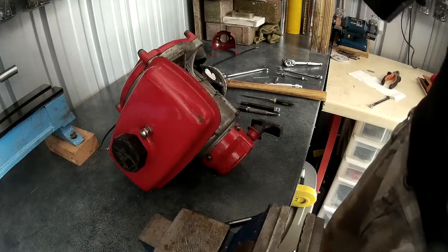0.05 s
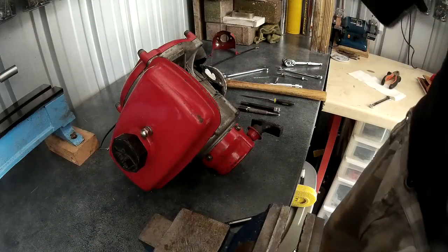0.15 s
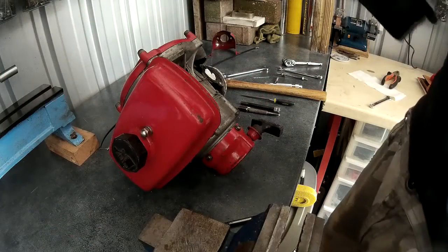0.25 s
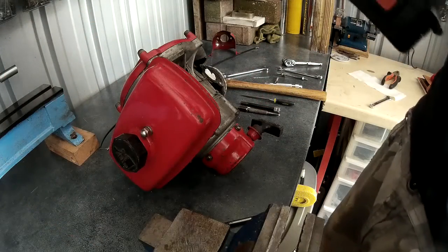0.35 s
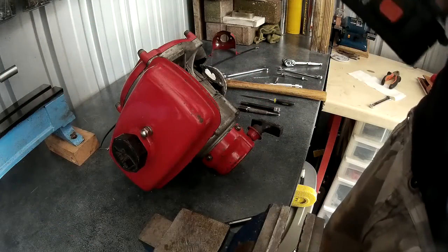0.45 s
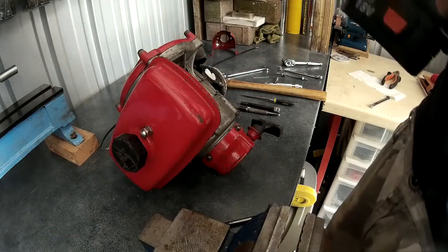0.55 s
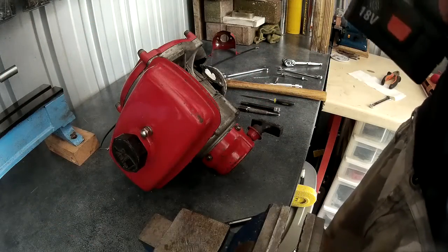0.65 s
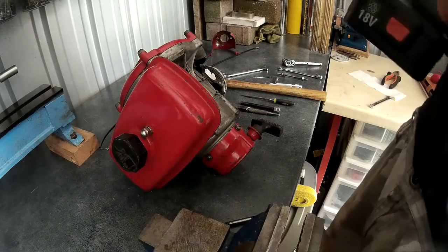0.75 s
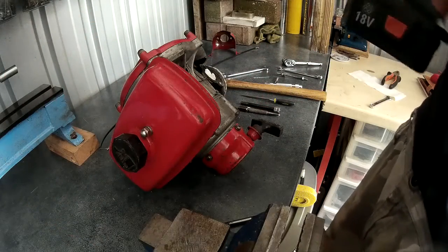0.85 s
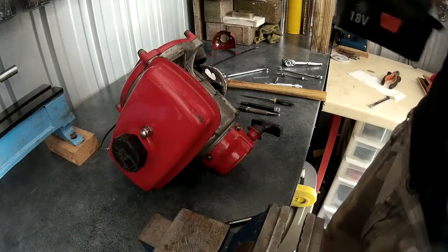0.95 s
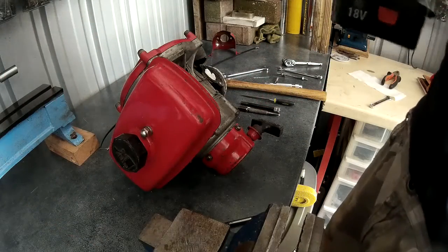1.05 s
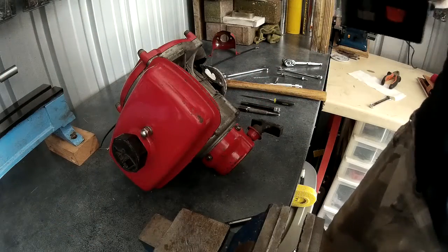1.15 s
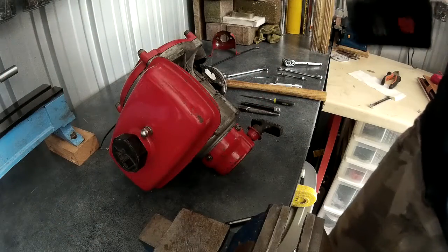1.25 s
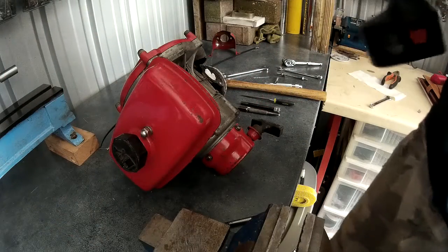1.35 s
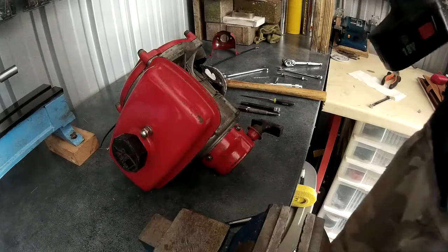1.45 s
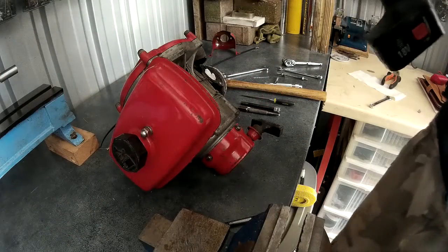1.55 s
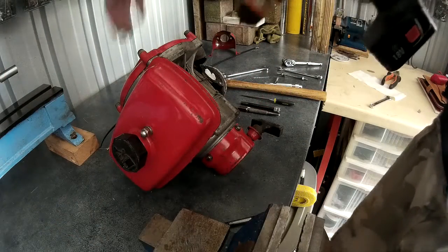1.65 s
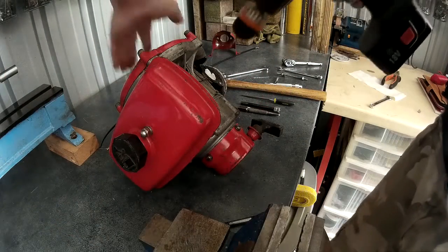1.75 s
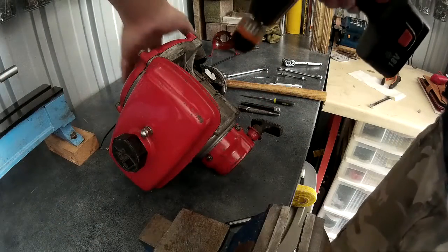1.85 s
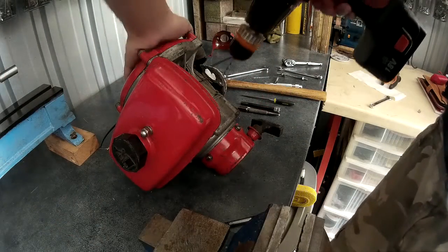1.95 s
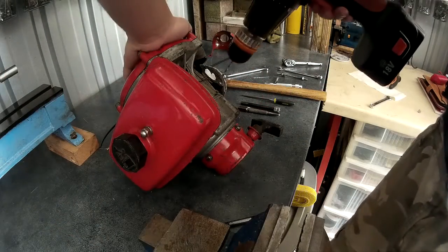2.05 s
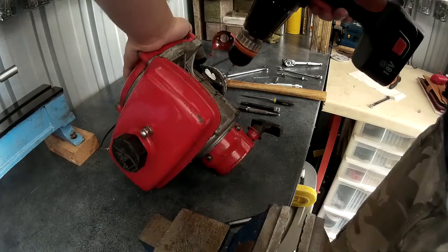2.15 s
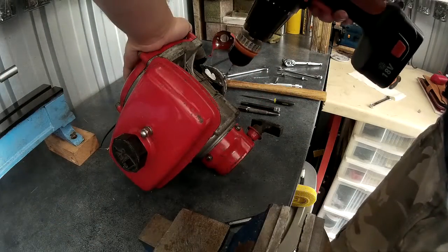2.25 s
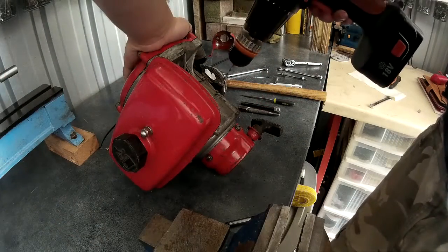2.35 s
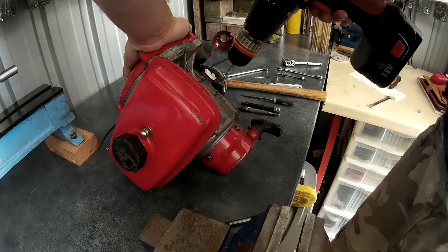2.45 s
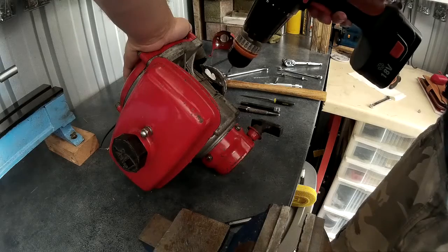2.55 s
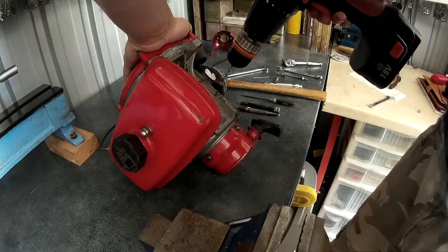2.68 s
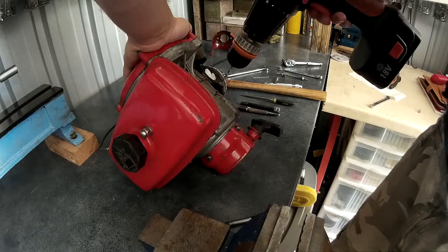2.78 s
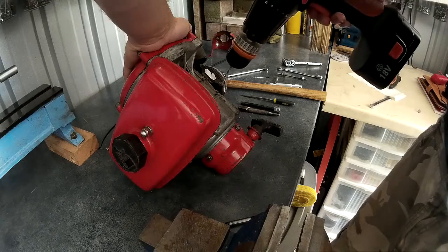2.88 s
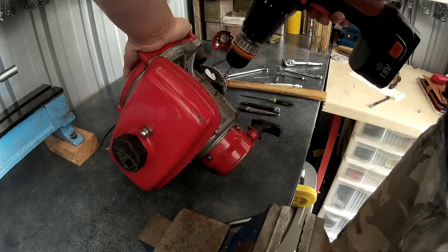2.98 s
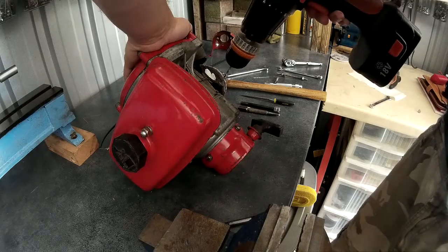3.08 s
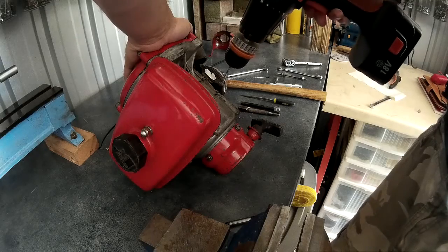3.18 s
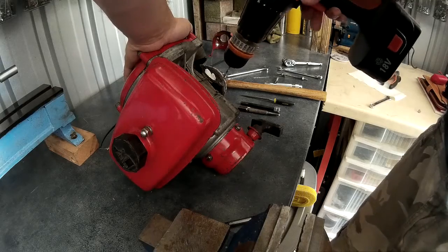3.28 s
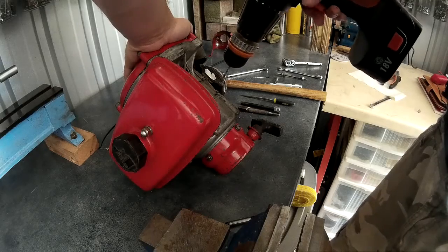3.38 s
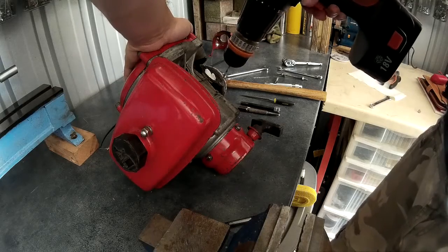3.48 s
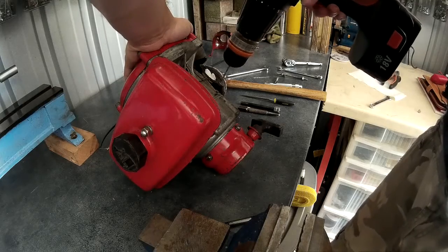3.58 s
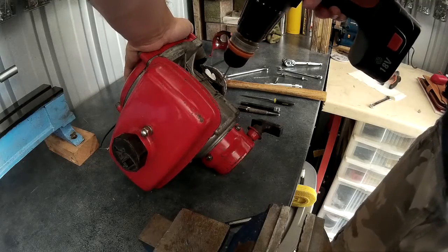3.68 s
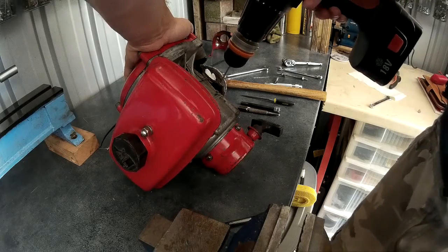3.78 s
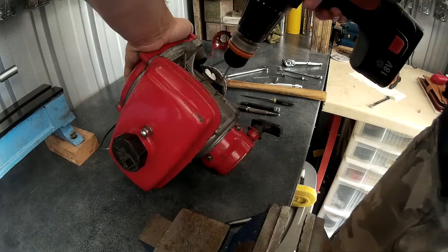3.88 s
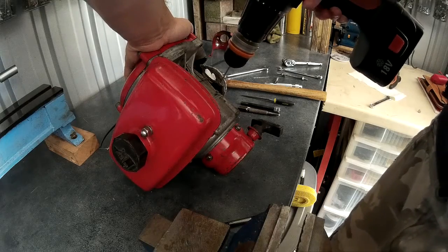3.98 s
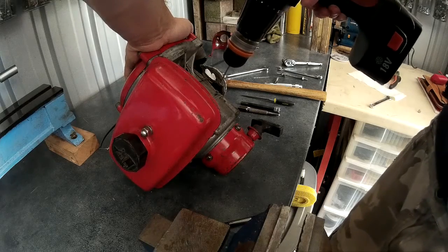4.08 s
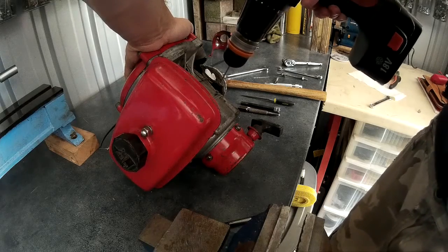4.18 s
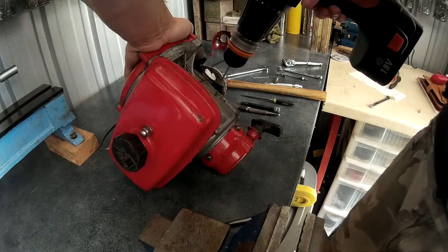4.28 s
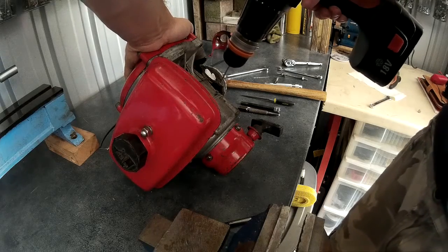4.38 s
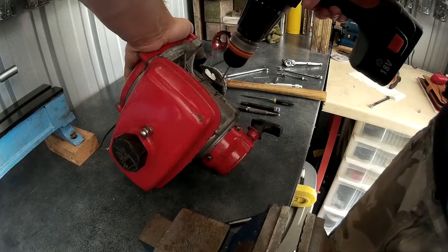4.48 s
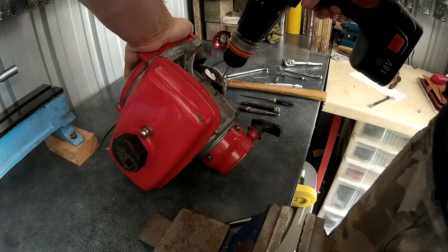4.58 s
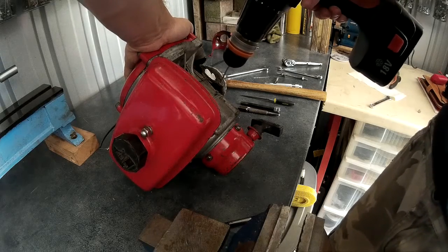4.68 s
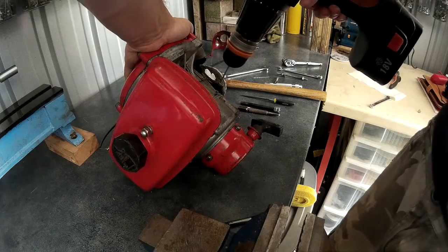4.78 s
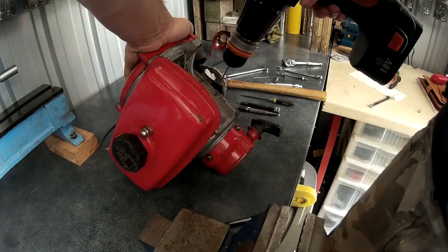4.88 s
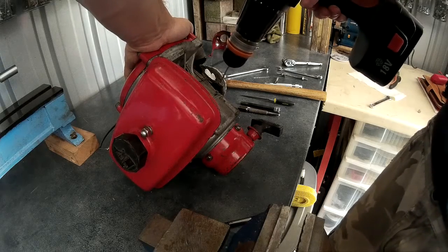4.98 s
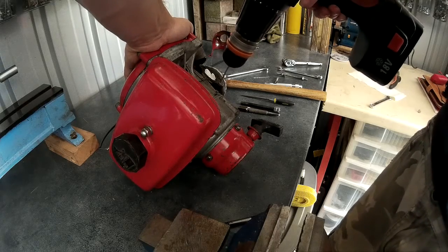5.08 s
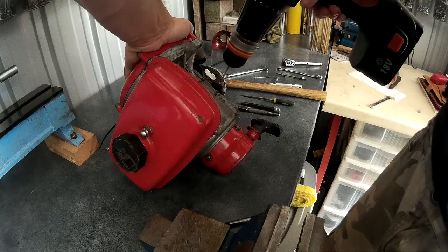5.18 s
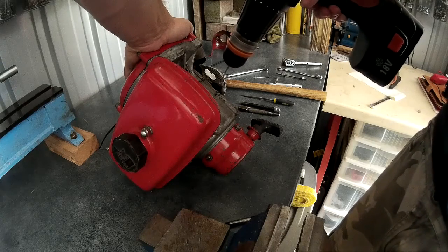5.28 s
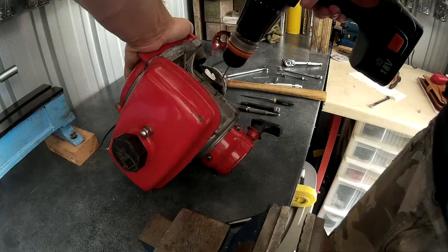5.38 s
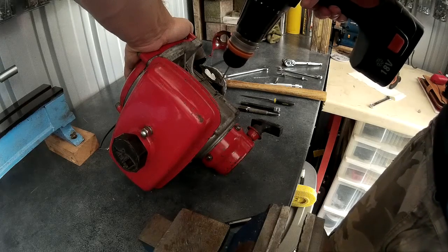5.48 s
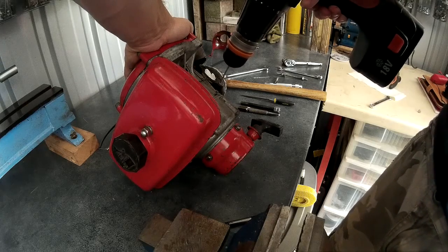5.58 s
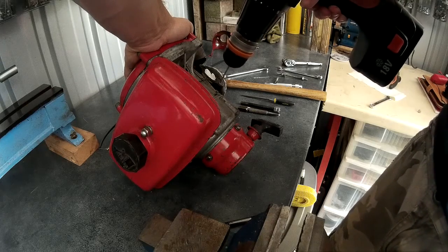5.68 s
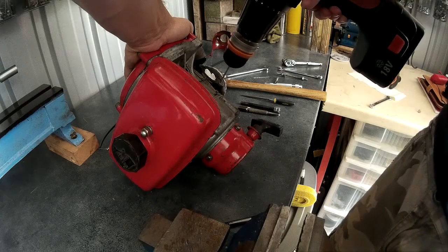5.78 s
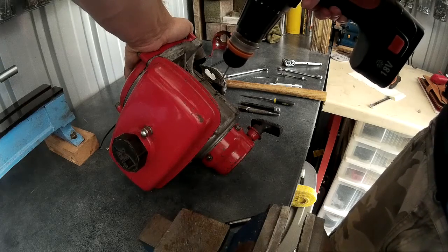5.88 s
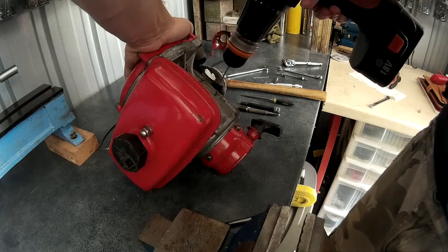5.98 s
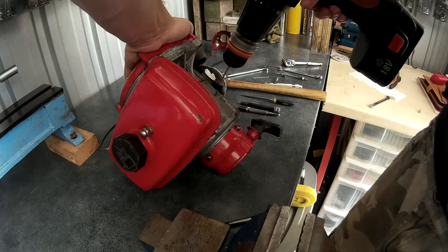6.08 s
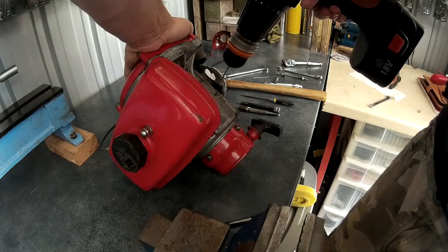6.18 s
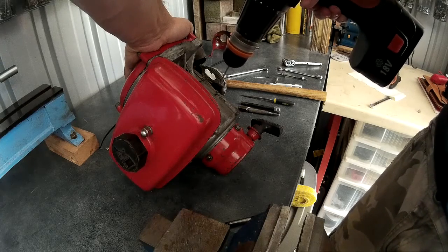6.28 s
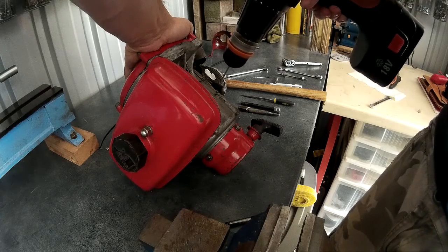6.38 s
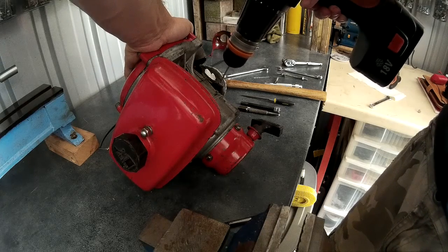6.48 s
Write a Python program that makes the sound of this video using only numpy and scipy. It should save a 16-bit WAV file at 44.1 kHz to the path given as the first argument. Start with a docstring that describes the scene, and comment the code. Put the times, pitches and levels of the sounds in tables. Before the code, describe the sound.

In a small workshop a drill clunks and rubs in the hand, then starts up and grinds steadily into an engine casing, growing harsher.

```python
"""Cordless drill into a small engine

A drill is picked up in a small workshop, a hand steadies an engine on the bench, and the bit runs into its casing.
Mesh tones that follow the chuck's angle beat into a hum that throbs once a turn; noise filtered by the housing
gives the gear rattle. Blurred tones make the motor whine; filtered noise makes the hiss of brushes and bit.
Knocks are decaying body and shell rings with noise thuds and cracks; rubbing, a squeak, faint high puffs and
room noise are shaped noise and narrow wandering tones."""
import sys
import numpy as np
from scipy import signal
from scipy.fft import rfft, irfft
from scipy.io import wavfile
from scipy.ndimage import map_coordinates

SR = 44100
rng = np.random.default_rng(int(sys.argv[2]) if len(sys.argv) > 2 else 0)


def to_wav(s):
    """Save 16-bit WAV."""
    ch = np.atleast_2d(s).T  # columns
    pcm = np.round(np.clip(ch, -1, 1) * 32767)  # PCM
    wavfile.write(sys.argv[1], SR, pcm.astype(np.int16))


N = 288369
TIME = np.arange(N) / SR  # seconds


def drill(gear_full_db=-21.5, motor_full_db=-31, hiss_db=0.34):
    """All parts follow one shaft; gear tones grow with the rattle, motor tones with the hiss."""
    turns = chuck_turns()
    hum_gain, rattle_gain, drive = effort()
    hum = hum_gain * gear_hum(turns) * backlash(turns)
    rattle = rattle_gain * gear_rattle(turns)
    # the whine table holds its levels when rattle and drive stand at these two reference levels
    gear_gain = rattle_gain / amp(gear_full_db)
    motor_gain = drive / amp(motor_full_db)
    tones = whine(turns, gear_gain, motor_gain) + motor_gain * chuck_rub(turns)
    return hum + rattle + tones + drive * amp(hiss_db) * hiss(turns)


# the trigger is pulled part way, then squeezed home; the hand leans in until the bit bites (s)
START_S, SQUEEZE_S, LEAN_S, BITE_S = 3.545, 3.7, 4.4, 4.75
SQUEEZE_TAKES_S, LEAN_TAKES_S = .33, .4
# chuck speed (turns a second): part trigger, full trigger, lost by leaning in, lost in each second of cutting
PART_SPEED, FULL_SPEED, LEAN_DROP, SAG_PER_S = 12.7, 13.38, .14, .022
# share of the speed missing at the start, and the time constant of making it up (s)
SPIN_LAG, SPIN_UP_S = .2, .025
TIGHT_AT = 5.067  # a moment when the gears pass their tight spot (s)


def chuck_turns():
    """Chuck angle in turns, whole at the tight spot; the trigger speeds it up, the load slows it."""
    spin = 1 - SPIN_LAG * np.exp(-np.maximum(TIME - START_S, 0) / SPIN_UP_S)
    free = PART_SPEED + (FULL_SPEED - PART_SPEED) * ease(SQUEEZE_S, SQUEEZE_TAKES_S)
    drag = LEAN_DROP * ease(LEAN_S, LEAN_TAKES_S) + SAG_PER_S * np.maximum(TIME - BITE_S, 0)
    turns = np.cumsum(spin * (free - drag)) / SR
    return turns - np.interp(TIGHT_AT, TIME, turns)


GEAR_ATTACK_S, MOTOR_ATTACK_S = 0.078, .2
# the load on the gears grows in two steps, with the squeeze and with the bite
LOAD_RISE_S, BITE_RISE_S, BITE_SHARE = 0.51, 0.041, 0.32
# gains under full load, and how much lower they are without load (dB)
HUM_DB, HUM_LOAD_DB = -18, 8.5
RATTLE_DB, RATTLE_LOAD_DB = -21, 6.5
HISS_DB, HISS_LOAD_DB = -32, 1.5
DEEPER_DB_PER_S = 0.5  # the rattle grows as the bit sinks in
JOLT_S, JOLT_LENGTH_S, JOLT_DB = 3.651, 0.0083, -16.5  # the gears jolt as the bit first catches


def effort():
    """Gains of gear hum, gear rattle and hiss: each rises at the start and grows with the load."""
    squeezed, bitten = ease(SQUEEZE_S, LOAD_RISE_S), ease(BITE_S, BITE_RISE_S)
    slack = 1 - (1 - BITE_SHARE) * squeezed - BITE_SHARE * bitten
    gears, motor = ease(START_S, GEAR_ATTACK_S), ease(START_S, MOTOR_ATTACK_S)
    jolt = amp(JOLT_DB) * swell(JOLT_S, JOLT_LENGTH_S)
    hum = motor * amp(HUM_DB - HUM_LOAD_DB * slack) + jolt
    deeper_db = DEEPER_DB_PER_S * np.maximum(TIME - BITE_S, 0)
    rattle = gears * amp(RATTLE_DB - RATTLE_LOAD_DB * slack + deeper_db)
    return hum, rattle, motor * amp(HISS_DB - HISS_LOAD_DB * slack)


# Gear mesh tones, in step at the tight spot of each turn.
# Each row: cycles in a turn of the chuck, relative level in dB.
MESH_TONES = [(44, -9), (45, -4), (46, -2), (48, -26)]


def gear_hum(turns):
    """Neighbouring mesh tones beat into one throb a turn; the backlash limits the swing and rounds its top."""
    tones = unit(sum(amp(db) * np.exp(2j * np.pi * round(k) * turns) for k, db in MESH_TONES))
    swing = tones / (1 + (abs(tones) / 1.45) ** 4) ** .25  # soft limit on the swing
    judder = 1 + .1 * drift(hz=25) + .11 * drift(hz=130)
    return unit((swing * judder).real)


def backlash(turns, at_turn=.685, width=0.03, slack_db=-5, take_up=0.082, clap_db=4):
    """The teeth lose contact for a moment, then clap together as they take up the load of each turn."""
    since = turns % 1 - at_turn
    gap = np.exp(-(since / width) ** 2)
    clap = np.exp(-((since - take_up) / width) ** 2)
    return amp(slack_db * gap + clap_db * clap)


# Colour of the housing and engine casing, shaken by the gears.
# Each row: frequency in Hz, relative level in dB per Hz.
HOUSING_COLOUR = [(40, -41), (90, -27.5), (180, -29.5), (290, -15.5), (410, -16.5), (500, -5), (560, 1.5),
                  (650, 2), (730, -2.5), (830, 0.5), (960, -9.5), (1120, -10.5), (1300, -24), (2500, -53)]


def gear_rattle(turns, throb_db=1.0):
    """The teeth knock harder at the tight spot and shake the housing."""
    return colour(scrape(turns, repeat=0.35) * tight_spot(turns, throb_db), HOUSING_COLOUR)


def tight_spot(turns, depth_db):
    """Load on the teeth: high for half of each turn of the chuck."""
    return unit(amp(depth_db * np.tanh(2 * np.cos(2 * np.pi * turns))))


def scrape(turns, repeat, size=3300):
    """Roughness of worn teeth that comes round with every turn, mixed with fresh chatter."""
    worn = map_coordinates(rng.standard_normal(size), [turns % 1 * size], order=3, mode="grid-wrap")
    share = np.clip(repeat, 0, 1)
    return np.sqrt(share) * unit(worn) + np.sqrt(1 - share) * rng.standard_normal(N)


# Gear and motor tones.
# Each row: cycles in a turn of the chuck, level in dB before the load gain, roughness from 0 to 1.
WHINE_TONES = [(12, -58, .1), (18, -46, .1), (24, -50, .2), (25, -53, .1), (36, -43, .2), (41, -33, .2),
               (51, -37, .3), (60, -34, .5), (64, -36, .3), (69, -40, .2), (72, -41, .2), (81, -46, .3),
               (108, -48, .3), (109, -48, .3), (114, -51, .3), (132, -47, .2), (136, -41, .2),
               (138, -47, .3), (161, -49, .5), (216, -45.5, .4), (270, -53, .7), (288, -48.5, .4),
               (313, -48.5, .5), (359, -54, .7), (387, -57, .9), (540, -60, .5), (553, -63, .5),
               (695, -68, .6), (720, -68, .7)]


def whine(turns, gear_gain, motor_gain, throb_db=2.0, motor_throb_db=2.0):
    """Tones blurred by play in their shafts; the slow ones belong to the gears, the fast ones to the motor."""
    out = np.zeros(N)
    slow = gear_gain * tight_spot(turns, throb_db)
    fast = motor_gain * tight_spot(turns, motor_throb_db)
    for k, db, rough in WHINE_TONES:
        blur = np.sqrt(1 - rough ** 2) + rough * drift(hz=26.0)
        tone = (blur * np.exp(2j * np.pi * (k * turns + rng.random()))).real
        out += amp(db) * np.sqrt(2) * tone * (slow if k < 100 else fast)
    return out


def chuck_rub(turns, order=179.5, rub_db=-42, at_turn=.53, sharp=1.4, rough=.6):
    """The chuck runs slightly out of true and rubs with a brief ring on the loose side of each turn."""
    touch = unit(np.exp(sharp * np.cos(2 * np.pi * (turns - at_turn))))
    since = (turns - at_turn + .5) % 1  # the phase of the ring starts afresh every turn
    ring = unit(((1 + rough * drift(hz=30)) * np.exp(2j * np.pi * order * since)).real)
    return amp(rub_db) * touch * ring


GEAR_RATIO = 24  # motor pulses in a turn of the chuck
# Colour of brushes, fan and bit.
# Each row: frequency in Hz, relative level in dB per Hz.
HISS_COLOUR = [(400, -51), (1400, 0.5), (2150, 0.5), (2420, -1.5), (2560, -9), (2900, -6), (4400, -11.5),
               (5300, -10), (6200, -21), (7300, -19), (9200, -22), (9800, -27.5), (11500, -24),
               (13300, -43)]


def hiss(turns, flutter=0.034, throb_db=0.88, loose_turn=0.5, treble_hz=4000, dull_db=-8, brighten_s=0.3):
    """Noise pulses with the motor, swells on each turn's loose side, brightens in the first moments of drilling."""
    pulse = 1 + flutter * np.cos(2 * np.pi * GEAR_RATIO * turns)
    throb = amp(throb_db * np.cos(2 * np.pi * (turns - loose_turn)))
    scratch = colour(scrape(turns, repeat=0.26) * pulse * throb, HISS_COLOUR)
    low = signal.sosfiltfilt(signal.butter(2, treble_hz, fs=SR, output="sos"), scratch)
    treble = scratch - low
    return low + treble * amp(dull_db * (1 - ease(START_S, brighten_s)))


# Colour of the engine's casing as it shudders.
# Each row: frequency in Hz, relative level in dB per Hz.
CASING_COLOUR = [(120, -34), (230, -6), (340, 0), (460, 0), (700, -12), (2000, -40)]


def shudder(s=3.665, level_db=-35, length=0.053):
    """The first catch of the bit shakes the engine's casing."""
    return amp(level_db) * swell(s, length) * colour(rng.standard_normal(N), CASING_COLOUR)


# thin squeal of the bit before it cuts; the gain is for a complex tone, whose real part is 3 dB softer
SQUEAL_S, SQUEAL_HZ, SQUEAL_GAIN_DB = 3.68, 11200, -56.5
SQUEAL_ATTACK_S, SQUEAL_HOLD_S, SQUEAL_T60 = .17, 0.48, 1.0  # hold counts from the start of the attack
# Brief scratches of the bit on the metal.
# Each row: centre in seconds, level in dB, half-length in seconds.
BIT_SCRATCHES = [(3.725, -33.5, 0.012), (4.795, -26.5, 0.013)]


def bit(width_hz=60):
    """The tip squeals thinly as it seats, a wandering narrow tone, and scratches now and then."""
    seating = amp(SQUEAL_GAIN_DB) * stroke(SQUEAL_S, SQUEAL_ATTACK_S, SQUEAL_HOLD_S, SQUEAL_T60)
    squeal = seating * (drift(hz=width_hz) * np.exp(2j * np.pi * SQUEAL_HZ * TIME)).real
    bursts = sum(amp(db) * swell(s, length) for s, db, length in BIT_SCRATCHES)
    return squeal + bursts * colour(rng.standard_normal(N), HISS_COLOUR)


# Knocks of the drill in the hand and on the engine.
# Each row: start in seconds, body level in dB, body pitch in Hz, body ring t60 in seconds, snap level in dB,
# snap centre in Hz, thud level in dB (before the thuds are halved).
KNOCK_HITS = [(.032, -39, 676, 0.06, -38, 1890, -52), (.197, -46, 700, .04, -48, 1700, -58),
              (.404, -40.5, 704, 0.031, -48, 1750, -45), (.516, -43, 624, .05, -46.5, 1410, -42),
              (.723, -56, 700, .03, -55, 1600, -64), (1.084, -39.5, 666, 0.065, -45, 1900, -44),
              (1.197, -24, 690, 0.022, -38, 1400, -61), (1.2425, -24.5, 710, 0.031, -33.5, 2100, -54),
              (1.2735, -19.5, 664, 0.03, -32.5, 1500, -65), (1.294, -40, 780, 0.045, -36, 3280, -62),
              (1.405, -40, 690, 0.032, -51, 2100, -62), (1.492, -38, 600, .04, -39, 3620, -59),
              (1.503, -48, 653, 0.083, -34, 2150, -45), (1.575, -48, 546, 0.056, -33, 2000, -39.5),
              (3.092, -49, 666, 0.04, -61, 1400, -51), (3.196, -46, 650, .03, -42.5, 1900, -62),
              (3.263, -24.5, 670, 0.039, -37.5, 1690, -29), (3.279, -32, 730, 0.056, -47, 1700, -42),
              (3.308, -53, 473, .04, -61, 1400, -60), (3.407, -50, 685, .06, -51, 1800, -50),
              (3.491, -52, 650, 0.062, -60, 1400, -52)]
# Modes of the plastic shell. Each row: frequency in Hz, ring t60 in seconds, relative level in dB.
SHELL_MODES = [(1027, 0.021, 21), (1220, 0.012, 4), (1590, 0.018, 1), (1770, 0.021, 6), (2048, 0.075, -9),
               (2233, 0.021, 2), (2820, 0.017, -5), (3200, 0.025, -6), (3570, 0.024, -5.5),
               (4460, 0.029, -11), (5080, .025, -1)]
# Colour of bench and engine. Each row: frequency in Hz, relative level in dB per Hz.
THUD_COLOUR = [(35, -8), (100, -10), (220, -2.5), (330, 0.5), (600, 0.5), (950, -12), (1400, -16),
               (4000, -56)]
# Colour of a hard contact. Each row: frequency in Hz, relative level in dB per Hz.
CRACK_COLOUR = [(500, -9), (1300, -1), (2300, 1), (3000, -8), (5300, -14.5), (6500, -20), (13000, -32)]


def knocks(crack_t60=0.085, crack_db=-15, thud_t60=0.15, rise=0.0013, upper=1.22, upper_db=-4, octaves=0.61):
    """Each knock rings a hollow body, snaps the plastic shell and thuds through the bench."""
    out, thuds, cracks = np.zeros(N), np.zeros(N), np.zeros(N)
    t = np.arange(SR // 4) / SR
    for s, body_db, hz, t60, snap_db, snap_hz, thud_db in KNOCK_HITS:
        pair = np.sin(2 * np.pi * hz * t) + amp(upper_db) * np.sin(2 * np.pi * hz * upper * t)
        body = amp(body_db - 60 * t / t60) * pair
        snap = np.zeros(len(t))
        for mode_hz, ring_t60, db in SHELL_MODES:
            # the hardness of the contact picks which modes of the shell ring
            share = np.exp(-(np.log2(mode_hz / snap_hz) / octaves) ** 2)
            mode = np.sin(2 * np.pi * (mode_hz * t + rng.random()))
            snap += amp(db - 60 * t / ring_t60) * share * mode
        snap *= amp(snap_db) / abs(snap).max()
        add(out, s, (body + snap) * (1 - np.exp(-t / rise)))
        add(cracks, s, amp(snap_db + crack_db - 60 * t / crack_t60))
        add(thuds, s, amp(thud_db - 60 * t / thud_t60))
    thud = .5 * thuds * colour(rng.standard_normal(N), THUD_COLOUR)
    return out + thud + cracks * colour(rng.standard_normal(N), CRACK_COLOUR)


def workshop(x, t60=0.15, wet_db=-11):
    """Short, dense echoes from bench and walls: decaying noise taps."""
    t = np.arange(SR // 2) / SR
    taps = rng.standard_normal(len(t)) * amp(-60 * t / t60) * (t > .004)
    return x + amp(wet_db) * signal.fftconvolve(x, taps / np.linalg.norm(taps))[:N]


# Strokes of hand and sleeve over the drill.
# Each row: start in seconds, length in seconds, level in dB, fade t60 in seconds.
SLIDE_STROKES = [(-.02, 0.23, -58.5, .9), (0.294, .5, -62, 0.57), (1.084, 0.52, -57.5, 1.5),
                 (1.266, 0.19, -55.5, .3), (1.502, 0.068, -50, 0.28), (2.888, 0.035, -61, 0.53),
                 (3.18, .12, -64, .4), (3.48, 0.053, -63, 0.22)]
SLIDE_ATTACK_S = 0.02
# Soft bumps as the hand steadies the engine and the drill settles on it.
# Each row: centre in seconds, half-length in seconds, level in dB.
SOFT_BUMPS = [(1.35, .25, -67), (2.627, .05, -68), (2.905, 0.032, -50.5), (2.946, 0.017, -51),
              (3.313, 0.04, -49.5)]
STIR_DB = -67.5  # low rumble of the moving arms
# Colour of the sliding hand. Each row: frequency in Hz, relative level in dB per Hz.
RUB_COLOUR = [(150, -13), (300, -8), (520, -5), (650, 1), (750, 0), (900, -10.5), (1300, -19),
              (2200, -21.5), (3000, -25), (6000, -31), (12000, -35)]
# Colour of bumps and moving arms. Each row: frequency in Hz, relative level in dB per Hz.
RUMBLE_COLOUR = [(25, -17), (70, -3), (140, -1), (210, -11), (320, -12.5), (550, -13.5), (1100, -43)]


def handling(patchy_db=2, ring_hz=748, ring_width_hz=35, ring_db=-7, ticks_db=-13):
    """Hand and sleeve slide unevenly over the drill and the engine, whose hollow body rings and ticks faintly."""
    strokes = [amp(db) * stroke(s, SLIDE_ATTACK_S, length, t60) for s, length, db, t60 in SLIDE_STROKES]
    rub = np.sqrt(sum(level ** 2 for level in strokes))
    bumps = [amp(db) * swell(s, length) for s, length, db in SOFT_BUMPS]
    rumble = np.sqrt(amp(STIR_DB) ** 2 + sum(level ** 2 for level in bumps))
    grip = amp(patchy_db * drift(hz=60).real)
    ring = unit((drift(hz=ring_width_hz) * np.exp(2j * np.pi * ring_hz * TIME)).real)
    friction = colour(grip * rng.standard_normal(N), RUB_COLOUR)
    slide = unit(friction + amp(ring_db) * ring + amp(ticks_db) * ticks())
    return rub * slide + rumble * colour(rng.standard_normal(N), RUMBLE_COLOUR)


def ticks(per_s=70, spread_db=4, tick_t60=.02):
    """Loose plastic parts tick at random while they are moved."""
    size = amp(spread_db * np.minimum(rng.exponential(1, N), 3)) * (rng.random(N) < per_s / SR)
    decay = amp(-60 * np.arange(SR // 10) / SR / tick_t60)
    return colour(signal.fftconvolve(size, decay)[:N] * rng.standard_normal(N), CRACK_COLOUR)


# the plastic grip squeaks as the hand shifts on it
SQUEAK_S, SQUEAK_HOLD_S, SQUEAK_T60, SQUEAK_HZ, SQUEAK_DB = 1.497, .07, .25, 2220, -59.5


def squeak(width_hz=130, attack=.008):
    """Skin sticks and slips on the plastic grip, heard as a narrow wandering tone."""
    tone = unit((drift(hz=width_hz) * np.exp(2j * np.pi * SQUEAK_HZ * TIME)).real)
    return amp(SQUEAK_DB) * stroke(SQUEAK_S, attack, SQUEAK_HOLD_S, SQUEAK_T60) * tone


# Faint narrow puffs of high noise, near 4.4 and 8.2 kHz.
# Each row: centre in seconds, centre frequency in Hz, level in dB, half-length in seconds.
HIGH_PUFFS = [(.08, 8250, -69, .04), (0.197, 4450, -70, .03), (.97, 4350, -72, .035),
              (1.87, 4300, -73, .04), (1.983, 8180, -75, 0.12), (2.59, 4400, -73, .035),
              (2.98, 8250, -74, .09), (3.378, 4350, -69.5, 0.05)]


def high_puffs(width_hz=280):
    """Narrow bands of noise that swell and fade briefly, high and faint."""
    out, bins = np.zeros(N), np.fft.rfftfreq(N, 1 / SR)
    for s, hz, db, length in HIGH_PUFFS:
        band_shape = np.exp(-((bins - hz) / width_hz) ** 2 / 2)
        band = irfft(rfft(rng.standard_normal(N)) * band_shape, N)
        out += amp(db) * swell(s, length) * unit(band)
    return out


# Colour of the quiet room. Each row: frequency in Hz, relative level in dB per Hz.
ROOM_COLOUR = [(15, -29), (25, 0), (127, -8.5), (208, -6), (244, -6), (507, -13), (750, -14.5), (1520, -18),
               (2140, -20.5), (3700, -22), (13000, -23)]
ROOM_DB = -63


def room():
    """Steady noise of the quiet room."""
    return amp(ROOM_DB) * colour(rng.standard_normal(N), ROOM_COLOUR)


def amp(db):
    """Decibels to gain."""
    return 10 ** (np.asarray(db) / 20)


def unit(x):
    """Scales to an rms of one."""
    return x / np.sqrt(np.mean(np.abs(x) ** 2) + 1e-20)


def colour(x, spectrum):
    """Filters by a spectrum of (Hz, dB) points, to an rms of one."""
    hz, db = np.transpose(spectrum)
    bins = np.fft.rfftfreq(N, 1 / SR)
    gain = amp(np.interp(np.log(bins + 1), np.log(hz), db))
    return unit(irfft(rfft(x) * gain, N))


def drift(hz):
    """Complex random wander, its speed limited softly around hz."""
    knots = np.arange(0, TIME[-1] + 1, 1 / 400)
    z = np.fft.fft(rng.standard_normal((len(knots), 2)) @ [1, 1j])
    z = np.fft.ifft(z * np.exp(-(np.fft.fftfreq(len(knots), knots[1]) / hz) ** 2))
    return unit(np.interp(TIME, knots, z))


def ease(start, takes):
    """Smooth rise from 0 to 1."""
    return np.sin(np.pi / 2 * np.clip((TIME - start) / takes, 0, 1)) ** 2


def stroke(start, attack, length, t60):
    """Envelope that rises, holds until its length is over, and dies away."""
    return ease(start, attack) * amp(-60 * np.maximum(TIME - start - length, 0) / t60)


def swell(s, length):
    """Bell-shaped envelope around time s, down to 1/e at length to either side."""
    return np.exp(-((TIME - s) / length) ** 2)


def add(mix, s, sound):
    """Mixes a sound in at time s."""
    part = mix[max(round(s * SR), 0):][:len(sound)]
    part += sound[:len(part)]


def scene():
    """Handling, then drilling, over the quiet of the room."""
    drilling = drill() + shudder() + bit()
    hands = workshop(knocks()) + handling() + squeak()
    return (drilling + hands + room() + high_puffs())[None]


EDGE_HZ = 13400  # cutoff of the low-pass


def record(dry):
    """A steep low-pass closes the top of the band."""
    lowpass = signal.firwin(511, EDGE_HZ, window=("kaiser", 9), fs=SR)
    return signal.oaconvolve(dry, lowpass[None], "same")


dry = scene()
out = record(dry)
to_wav(out)
```